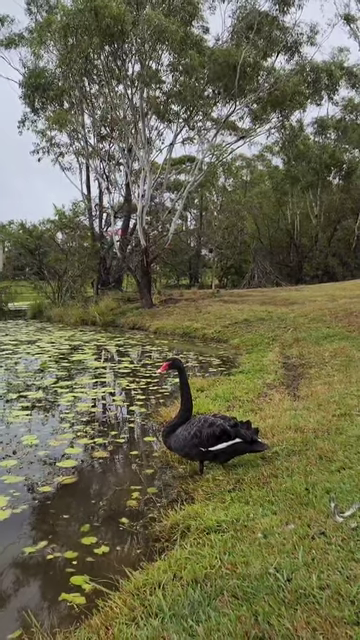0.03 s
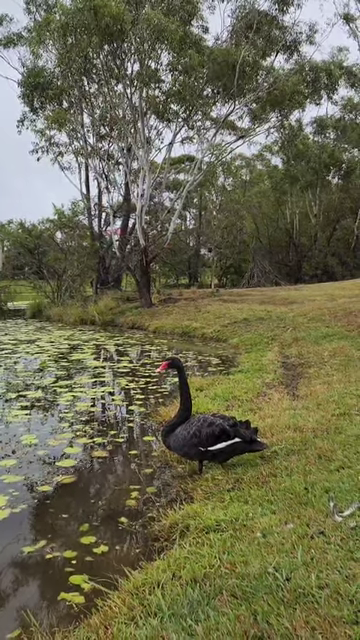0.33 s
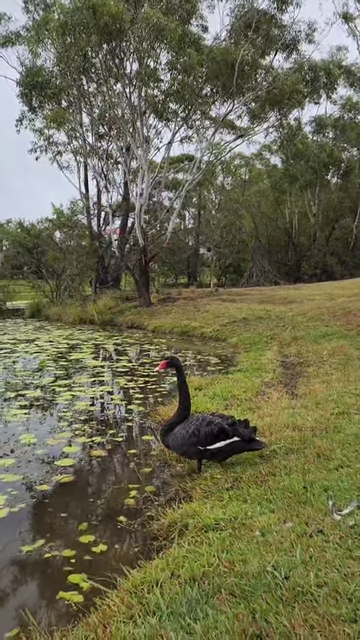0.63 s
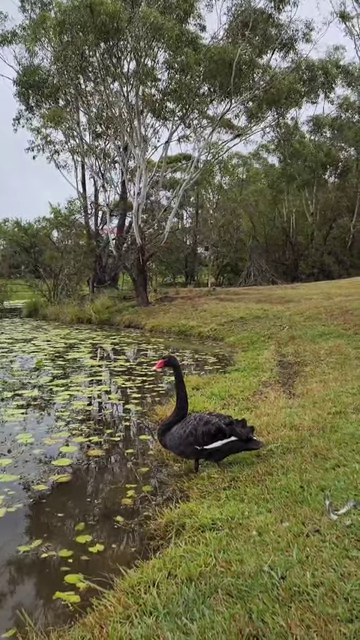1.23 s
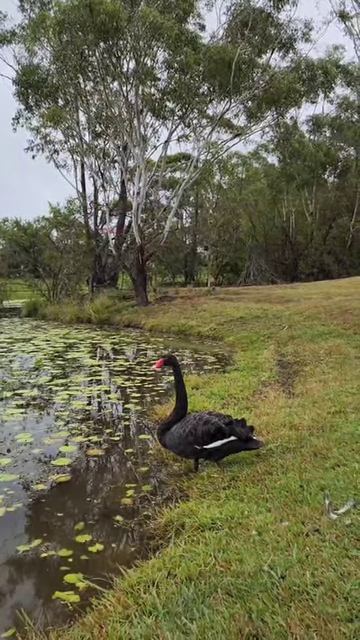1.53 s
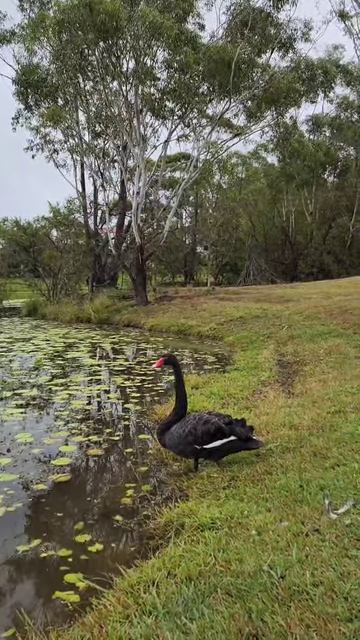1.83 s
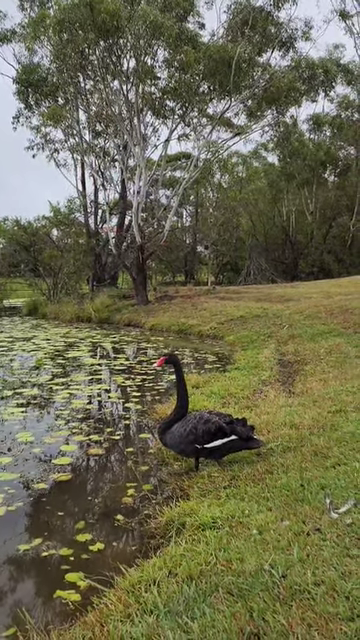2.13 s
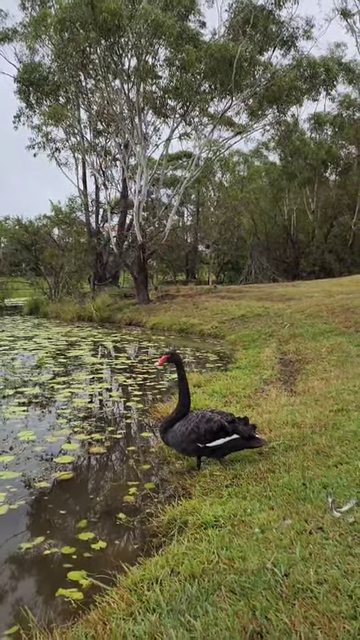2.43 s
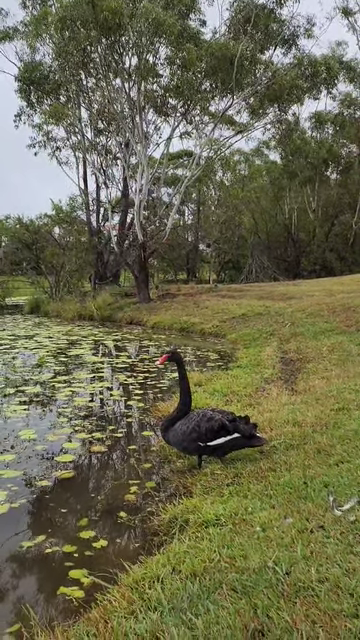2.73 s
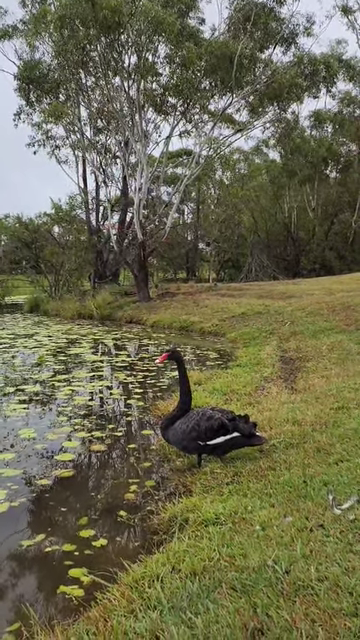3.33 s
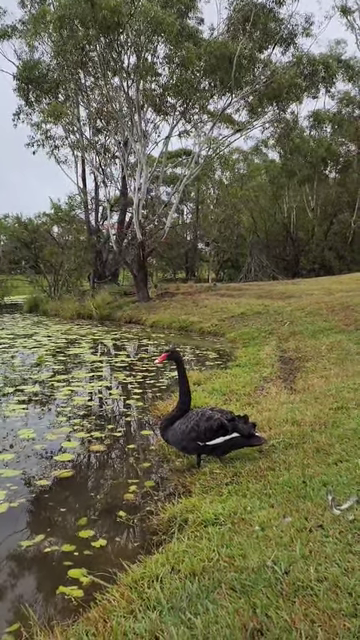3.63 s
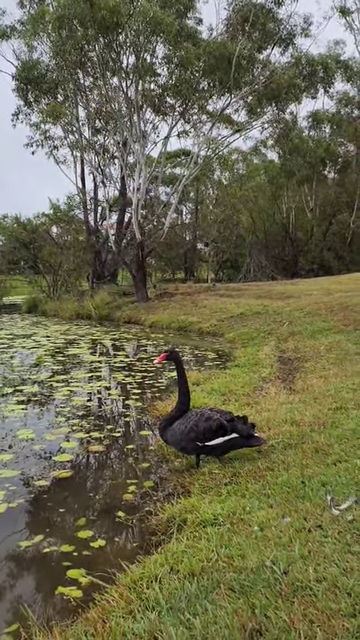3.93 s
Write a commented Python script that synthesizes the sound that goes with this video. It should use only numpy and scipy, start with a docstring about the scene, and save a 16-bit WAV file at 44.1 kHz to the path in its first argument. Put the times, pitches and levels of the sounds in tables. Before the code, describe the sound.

A small bird gives two quick bursts of squeaky notes over distant traffic rumble.

```python
"""Distant traffic rumbles beside a pond, with an engine's wavering hum and the hiss of open air.
A few faint ticks snap nearby, and far birds whistle thin arches, blurred by leaves and echoing in the trees.
A small bird close by gives two quick bursts of nasal, squeaky notes: harmonics and raspy breath through
one throat resonance. Under its second burst a water bird hoots once, a soft, nearly pure tone."""
import sys
import numpy as np
from scipy import signal
from scipy.fft import rfft, irfft
from scipy.io import wavfile

SR = 44100
rng = np.random.default_rng(int(sys.argv[2]) if len(sys.argv) > 2 else 0)


def wav_out(sig):
    """Save sig, one row per channel (or a flat mono array), as 16-bit PCM at SR to the path in sys.argv[1]."""
    wavfile.write(sys.argv[1], SR, np.round(np.clip(np.atleast_2d(sig).T, -1, 1) * 32767).astype(np.int16))


N = 4 * SR


def from_db(db):
    """Decibels to gain."""
    return 10 ** (np.asarray(db) / 20)


def rms_one(x):
    """Scale to unit rms."""
    return x / np.sqrt(np.mean(x ** 2) + 1e-20)


def at_hz(points, hz):
    """Read an EQ curve, in dB, on a log-frequency axis."""
    f, db = np.transpose(points)
    return np.interp(np.log(hz + 1e-3), np.log(f), db)


def in_time(rows):
    """Turn timed breakpoints into one automation curve per column."""
    times, *columns = np.transpose(rows)
    return [np.interp(np.arange(N) / SR, times, column) for column in columns]


def drift(rate, size):
    """Random modulation of spread about 1, gliding to a new value rate times a second."""
    knots = rng.standard_normal(4096)
    return np.interp(np.arange(size) / SR * rate, np.arange(len(knots)), knots) * np.sqrt(3 / 2)


def noise(spectrum):
    """Steady noise of the given colour, rms 1."""
    colour = from_db(at_hz(spectrum, np.fft.rfftfreq(N, 1 / SR)))
    return rms_one(irfft(rfft(rng.standard_normal(N)) * colour, N))


def phase_of(hz):
    """Running phase of a pitch curve."""
    return 2 * np.pi * np.cumsum(hz) / SR


def tone(hz):
    """A sine of rms 1 that follows a pitch curve."""
    return np.sqrt(2) * np.sin(phase_of(hz))


def bandpass(x, low_hz, high_hz):
    """Keep one band, with gentle slopes."""
    return signal.sosfilt(signal.butter(2, [low_hz, high_hz], "band", fs=SR, output="sos"), x)


def envelope(length, attack_s, release_s):
    """Rounded attack, hold and release."""
    t = np.arange(int(length * SR)) / SR
    fade_in = np.sin(np.pi / 2 * np.clip(t / attack_s, 0, 1))
    fade_out = np.sin(np.pi / 2 * np.clip((length - t) / release_s, 0, 1)) ** 2
    return fade_in * fade_out


def arch(size, top, scoop, sag, scoop_share):
    """Pitch in Hz that scoops up, holds and sags at the end; a negative sag flicks up."""
    progress = np.linspace(0, 1, size)
    return top - scoop * np.clip(1 - progress / scoop_share, 0, 1) ** 2 - sag * progress ** 5.5


def add(out, start, x):
    """Mix a short sound in at its time."""
    i = max(int(start * SR), 0)
    out[i:i + len(x)] += x[:N - i]


def traffic():
    """Distant road rumble, swelling slightly, with a wavering engine hum and two weaker drones."""
    # colour of the road rumble: (frequency [Hz], relative level [dB])
    rumble = [(20, -23), (30, -26), (40, -8), (50, -6), (62, 2.5), (85, -2), (110, -2), (150, -5),
              (230, -9.5), (300, -15), (420, -21.5), (620, -19), (1050, -22), (1600, -28.5), (2200, -35),
              (3500, -59)]
    # slow swell of the rumble: (time [s], gain [dB])
    swell = [(0, -0.5), (.6, 0.46), (1.3, 0.3), (1.9, -0.5), (2.6, -0.74), (3.3, 0), (4, 0.4)]
    # rise and fall of the engine hum: (time [s], level [dB])
    hum = [(0, -25.5), (.6, -23), (.95, -30), (1.25, -22.5), (1.8, -28.5), (2.1, -35.5), (2.9, -32.5),
           (3.35, -26), (4, -31)]
    # traffic drones: (pitch [Hz], level [dB])
    drones = [(226, -37), (326, -42.5)]
    rumble_db, hum_hz, waver, flutter_db = -21, 126.55, 0.01217, 1.5
    (hum_db,), (swell_db,) = in_time(hum), in_time(swell)
    out = from_db(rumble_db + swell_db) * noise(rumble)
    for hz, db in [(hum_hz, hum_db), *drones]:
        gain = from_db(db + flutter_db * drift(13, N))
        out += gain * tone(hz * (1 + waver * drift(10, N)))
    return out


def open_air():
    """A faint, steady bed of hiss."""
    # colour of the hiss: (frequency [Hz], relative level [dB])
    hiss = [(1500, 0.5), (2800, 6.5), (3600, -0.5), (4500, -1), (5600, 0), (6600, -3.5), (8000, -11.5),
            (10500, -15.5), (12500, -27), (15500, -46)]
    return from_db(-42) * noise(hiss)


def ticks():
    """Tiny dry snaps: bursts of narrow-band noise, each a few milliseconds long."""
    # nearby snaps: (time [s], level of half the peak [dB], band centre [Hz])
    snaps = [(.190, -42, 7000), (.285, -50, 10500), (0.362, -44, 8500), (0.931, -30, 4700),
             (1.889, -40, 5800), (1.895, -39.5, 9700), (2.603, -40.5, 7500), (3.45, -33.5, 4870),
             (3.829, -38.5, 9600)]
    decay_s, edge_ratio = 0.0013, 1.166
    out, t = np.zeros(N), np.arange(SR // 20) / SR
    for start, db, hz in snaps:
        burst = rng.standard_normal(len(t)) * np.exp(-t / decay_s)
        snap = bandpass(burst, hz / edge_ratio, hz * edge_ratio)
        add(out, start, 2 * from_db(db) * snap / np.abs(snap).max())
    return out


def trees(x, t60_s, predelay_s=0.023):
    """Diffuse echo from the trees around the pond."""
    t = np.arange(SR) / SR
    tail = rng.standard_normal(SR) * from_db(-60 * t / t60_s) * (t > predelay_s)
    return signal.fftconvolve(x, tail / np.sqrt(np.sum(tail ** 2)))[:N]


def slap(x, delay_s=0.047, gain_db=-11, centre_hz=6360, width_hz=500):
    """One thin, bright slapback that keeps only a narrow band of treble."""
    treble = bandpass(x, centre_hz - width_hz / 2, centre_hz + width_hz / 2)
    return from_db(gain_db) * np.pad(treble, (int(delay_s * SR), 0))[:N]


def far_birds():
    """Thin whistles from the trees: gliding sines with a fast waver."""
    # far calls: (start [s], length [s], level before the mix [dB], held pitch [Hz], scoop [Hz], sag [Hz]); the
    # faint long row at 0.771 s is not a call of its own but the top note of the call before it, lingering in
    # the trees
    whistles = [(.346, 0.047, -50, 2700, 300, -200), (.40, 0.14, -51, 3215, 463, 750),
                (.56, .076, -51, 3170, 390, 98), (0.658, 0.14, -51, 3565, 560, 900),
                (0.771, .19, -59, 3570, 30, 20), (1.303, .05, -49, 2300, 503, -400),
                (1.687, 0.026, -45, 2370, 200, 50), (2.365, .034, -44.5, 2450, 402, -380),
                (2.391, 0.065, -49, 2960, 220, 330), (2.363, .024, -52, 4450, 500, -200),
                (3.056, 0.062, -47, 2000, 334, -250), (3.138, 0.074, -44.5, 1433, 150, -30),
                (3.183, 0.039, -44, 2400, 300, -500)]
    fade_s, waver, waver_per_s = 0.011, .022, 173.3
    out = np.zeros(N)
    for start, length, db, top, scoop, sag in whistles:
        env = envelope(length, fade_s, fade_s)
        pitch = arch(len(env), top, scoop, sag, scoop_share=.6)
        pitch *= 1 + waver * drift(waver_per_s, len(env))
        add(out, start, from_db(db) * env * tone(pitch))
    return out


def leaves(x, decay_s=.012):
    """Foliage scatters a far call over a few hundredths of a second."""
    t = np.arange(SR // 10) / SR
    scatter = rng.standard_normal(len(t)) * np.exp(-t / decay_s)
    return signal.fftconvolve(x, scatter / np.sqrt(np.sum(scatter ** 2)))[:N]


def throat(hz, centre, width):
    """Response of the near bird's throat: its colour and one resonance."""
    # colour of the bird's voice: (frequency [Hz], gain [dB])
    colour = [(700, -30), (2200, 4), (3000, 8), (3600, 1), (4300, 11), (5200, 6.5), (6050, 3.5),
              (6600, -6.5), (7400, -18), (8250, -6.5), (9500, -21), (13000, -24), (14500, -6), (16000, -12)]
    return from_db(at_hz(colour, hz)) / (1 + 1j * centre / width * (hz / centre - centre / hz))


def rasp(phase, centre, width_hz=2100):
    """Breath noise through the throat, puffed once per cycle of the voice; rms 1."""
    size = SR // 10
    response = throat(np.fft.rfftfreq(size, 1 / SR) + 1, centre, width_hz)
    breath = irfft(rfft(rng.standard_normal(size)) * response)
    return rms_one(breath[:len(phase)] * (1 + .5 * np.cos(phase)))


def near_bird():
    """Nasal notes: harmonics through the throat, roughened by jitter, shimmer and rasp."""
    # the small bird's notes: (start [s], length [s], level [dB], held pitch [Hz], scoop [Hz], sag [Hz],
    # throat centre [Hz], throat width [Hz], roughness [0-1], gain of the shrill overtones [dB])
    notes = [(1.688, 0.031, -38, 722, 7, 10, 5300, 3500, .8, -8),
             (1.757, 0.028, -34, 779, 1, 68, 4100, 700, 0.56, 3),
             (1.826, 0.02, -22, 746, 18, 0, 4740, 1200, 0.46, -1),
             (1.839, .015, -37, 783, 2, 20, 5400, 1200, 0.5, -8),
             (1.898, 0.022, -22.5, 837, 16, 4, 4630, 200, 0.2, 6),
             (1.912, .013, -46, 810, 0, 0, 5500, 900, .3, -8),
             (1.968, 0.0091, -21, 688, 13, 0, 4200, 300, 0.3, 17),
             (1.973, 0.023, -24, 740, 34, 72, 4820, 650, 0.3, 5),
             (3.495, 0.036, -26.5, 738, 5, 109, 4500, 1200, 0.2, -12),
             (3.585, 0.038, -27.5, 742, -6, 72, 5530, 3600, 0.3, -13),
             (3.637, .013, -37.5, 786, 0, 12, 4270, 1200, .7, -10),
             (3.684, 0.06, -26, 758, 80, 113, 5470, 3600, 0.2, -16)]
    jitter, shimmer_depth, rough_per_s, shrill_from_hz = 0.021, .6, 470, 6630
    out, harmonics = np.zeros(N), np.arange(1, 21)[:, None]
    for start, length, db, top, scoop, sag, centre, width, rough, shrill_db in notes:
        env = envelope(length, attack_s=0.0058, release_s=0.36 * length)
        size = len(env)
        pitch = arch(size, top, scoop, sag, scoop_share=0.273)
        pitch *= 1 + jitter * rough * drift(rough_per_s, size)
        hz, phase = harmonics * pitch, phase_of(pitch)
        # the band is slightly narrower at the ends of a note, where the beak shuts
        band = width * (.95 + .05 * np.sin(np.linspace(0, np.pi, size)))
        partials = throat(hz, centre, band) * from_db(shrill_db * (hz > shrill_from_hz))
        # each harmonic flickers on its own in level and phase
        flicker = np.array([drift(rough_per_s, size) + 1j * drift(rough_per_s, size) for _ in harmonics])
        shimmer = 1 + shimmer_depth * rough * flicker
        voice = np.real(partials * shimmer * np.exp(1j * harmonics * phase)).sum(axis=0)
        note = rms_one(rms_one(voice) + rough * rasp(phase, centre))
        add(out, start, from_db(db) * env * note)
    return out


def squeaks(fade_s=0.0032, sag_hz=80):
    """Pure, high blips that open some of the near bird's notes."""
    # opening squeaks: (start [s], length [s], level [dB], pitch [Hz])
    blips = [(1.758, .017, -35, 4680), (1.822, .0075, -23, 4800), (1.895, 0.0082, -21.5, 4770),
             (3.581, 0.0093, -21, 4710)]
    out = np.zeros(N)
    for start, length, db, hz in blips:
        env = envelope(length, fade_s, fade_s)
        pitch = arch(len(env), hz, scoop=0, sag=sag_hz, scoop_share=1)
        add(out, start, from_db(db) * env * tone(pitch))
    return out


def water_bird():
    """One soft, slightly unsteady hoot: a sine that rises, then sags and fades."""
    # contour of the hoot: (time [s], pitch [Hz], level [dB])
    hoot = [(3.57, 745, -48), (3.615, 771, -29.5), (3.665, 795, -30), (3.705, 776, -31), (3.745, 754, -36),
            (3.785, 730, -38), (3.82, 720, -50)]
    waver, flutter_db, waver_per_s = .004, 2.5, 70
    hz, db = in_time(hoot)
    t = np.arange(N) / SR
    gate = (t > hoot[0][0]) * (t < hoot[-1][0])
    voice = tone(hz * (1 + waver * drift(waver_per_s, N)))
    return from_db(db + flutter_db * drift(waver_per_s, N)) * voice * gate


def scene():
    """Birds and ticks over a bed of traffic and air; near sounds stay fairly dry, far whistles are wet."""
    bed = traffic() + open_air()
    near = near_bird() + squeaks() + ticks()
    hoot, far = water_bird(), far_birds()
    near_echo = slap(near) + from_db(-21) * trees(near, t60_s=1.3)
    far_echo = trees(from_db(3) * far + from_db(-18) * hoot, t60_s=1.06)
    return (bed + near + hoot + from_db(1) * leaves(far) + near_echo + far_echo)[None]


def record(dry, cutoff_hz=15650):
    """A steep low-pass takes off the very top."""
    return signal.sosfilt(signal.ellip(12, .1, 80, cutoff_hz, fs=SR, output="sos"), dry)


dry = scene()
out = record(dry)
wav_out(out)
```